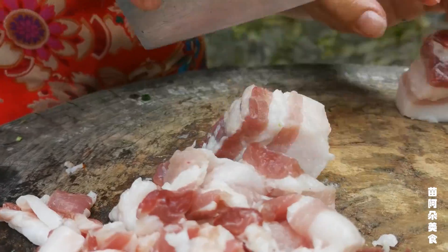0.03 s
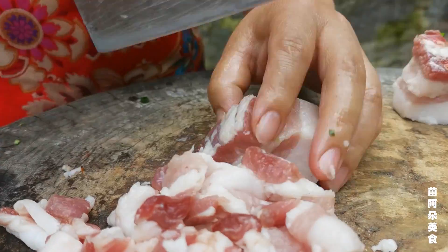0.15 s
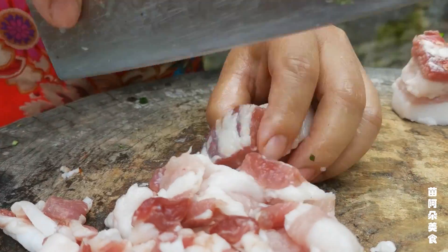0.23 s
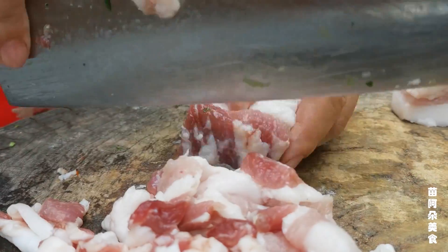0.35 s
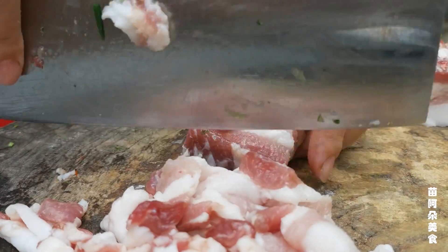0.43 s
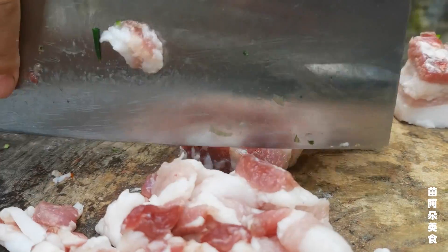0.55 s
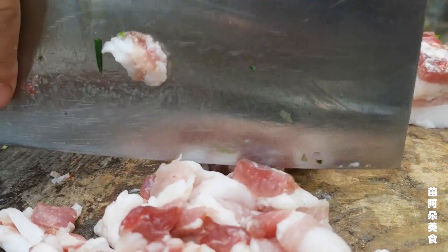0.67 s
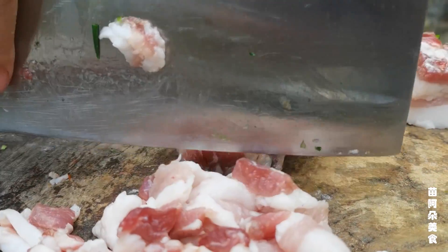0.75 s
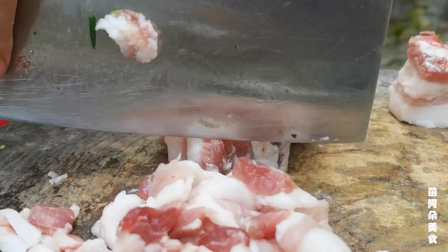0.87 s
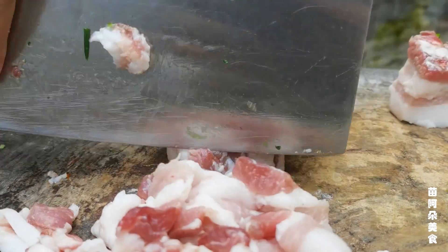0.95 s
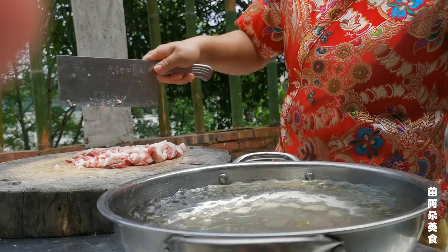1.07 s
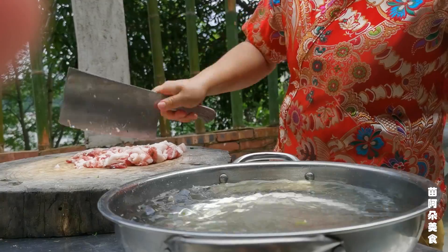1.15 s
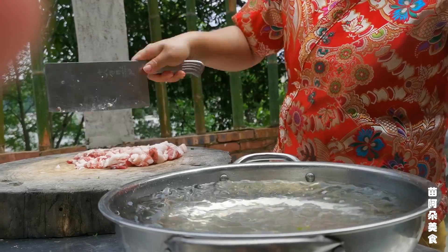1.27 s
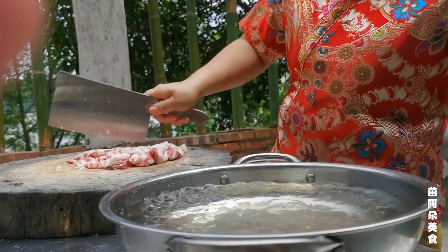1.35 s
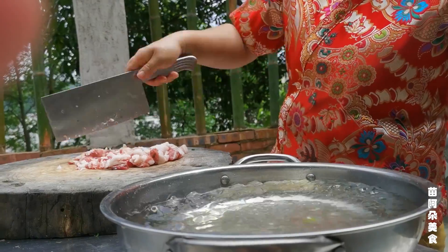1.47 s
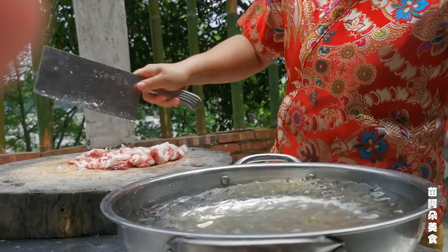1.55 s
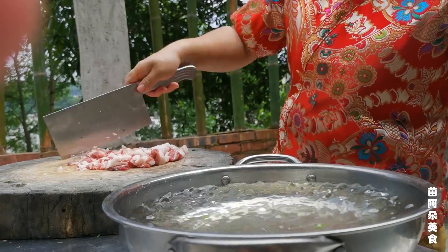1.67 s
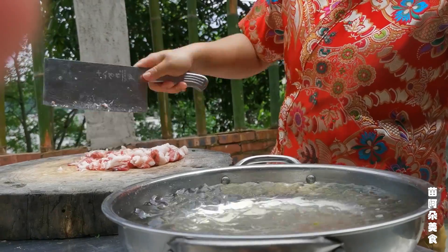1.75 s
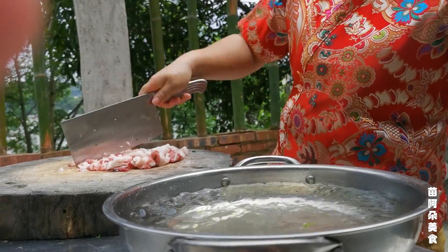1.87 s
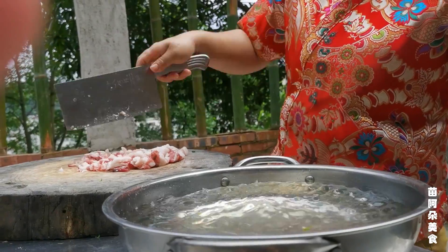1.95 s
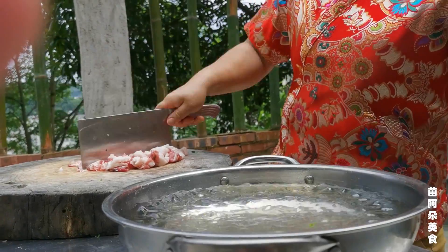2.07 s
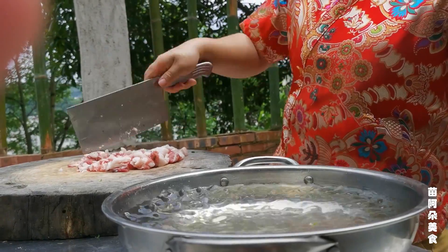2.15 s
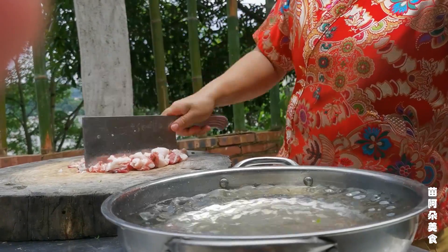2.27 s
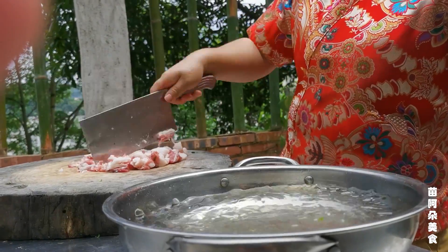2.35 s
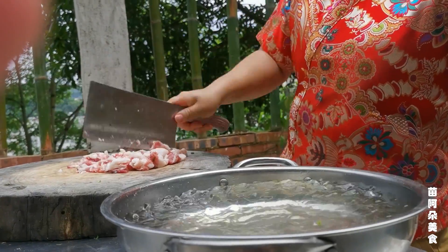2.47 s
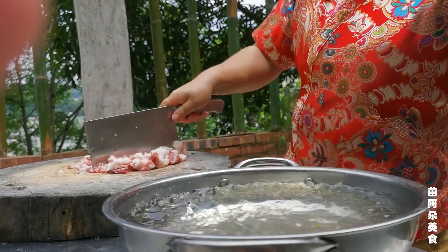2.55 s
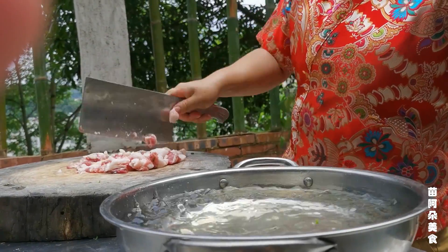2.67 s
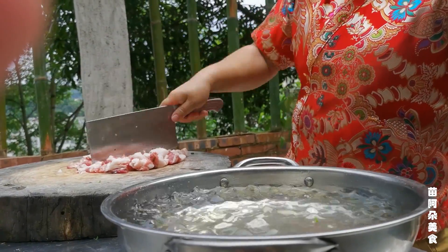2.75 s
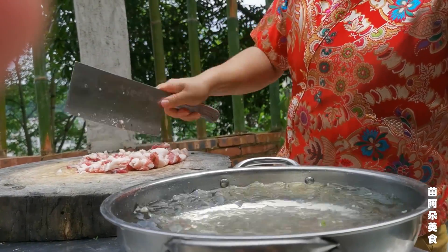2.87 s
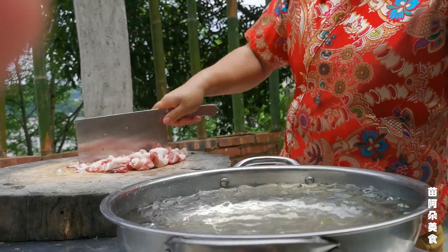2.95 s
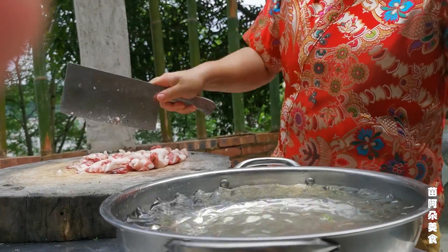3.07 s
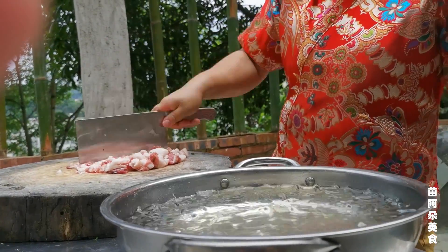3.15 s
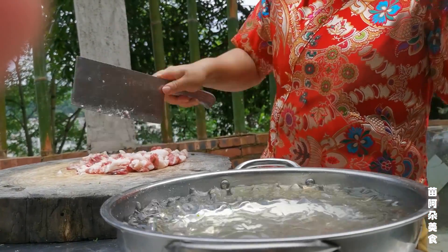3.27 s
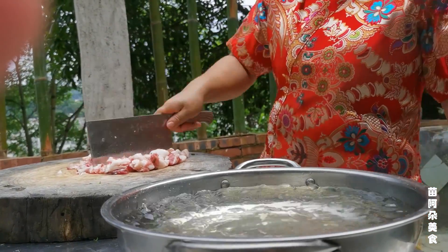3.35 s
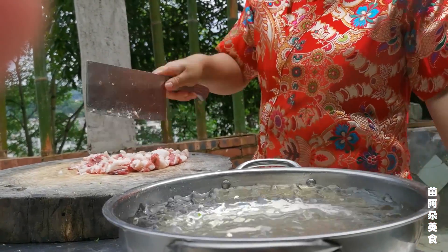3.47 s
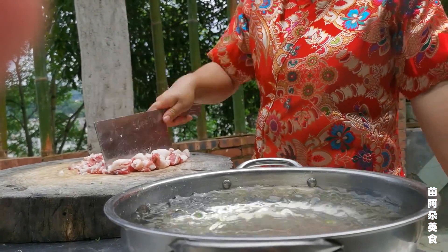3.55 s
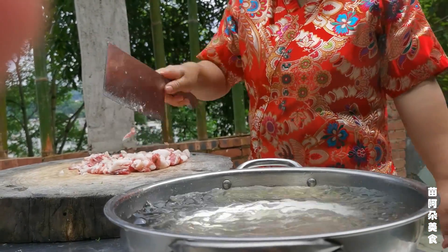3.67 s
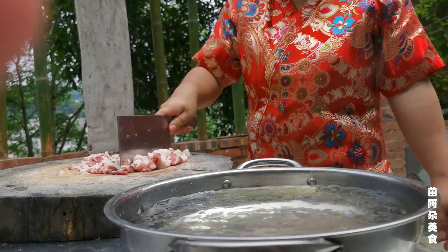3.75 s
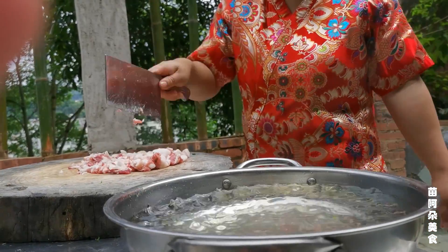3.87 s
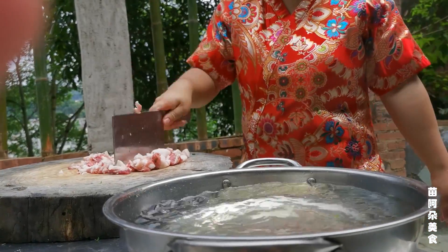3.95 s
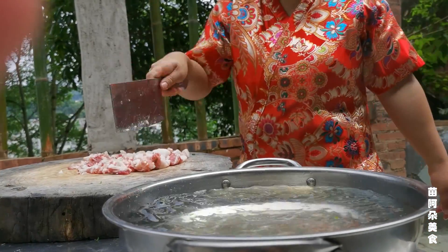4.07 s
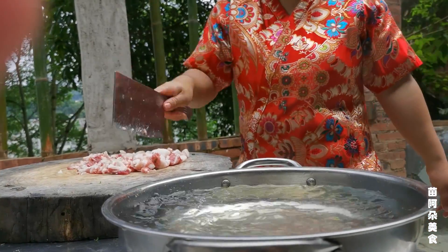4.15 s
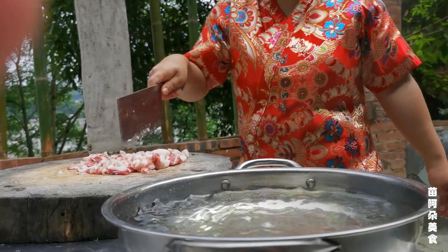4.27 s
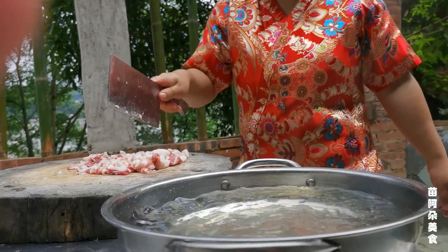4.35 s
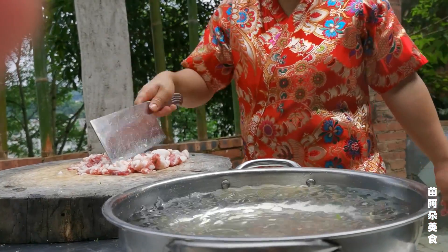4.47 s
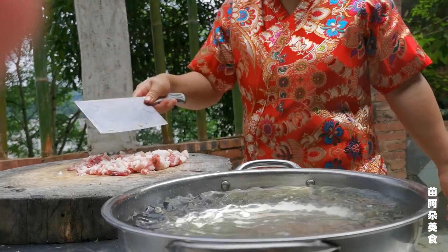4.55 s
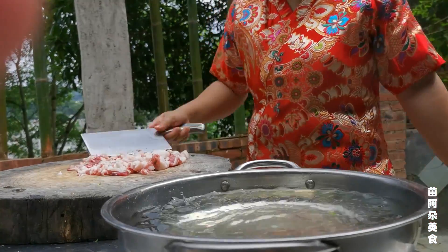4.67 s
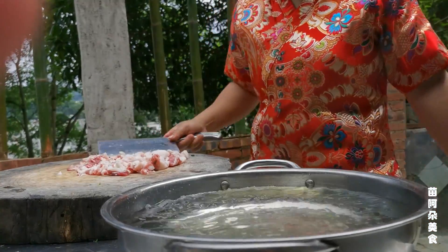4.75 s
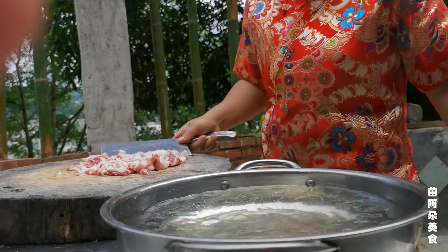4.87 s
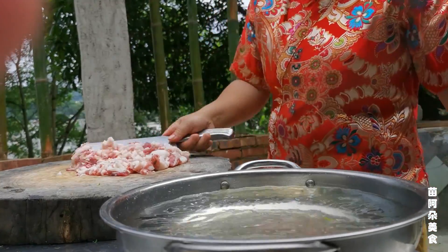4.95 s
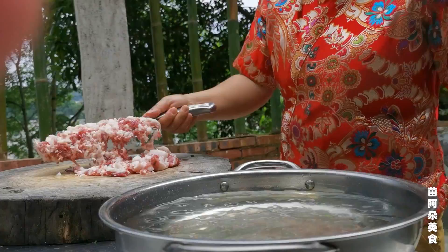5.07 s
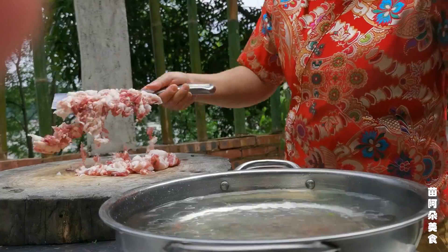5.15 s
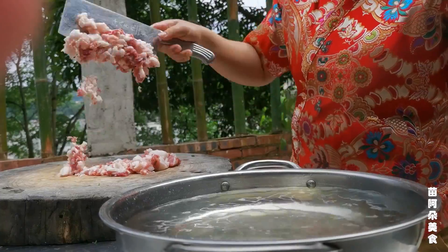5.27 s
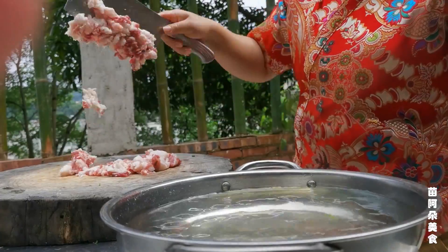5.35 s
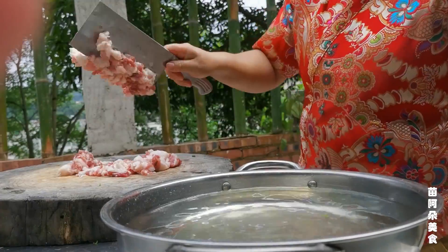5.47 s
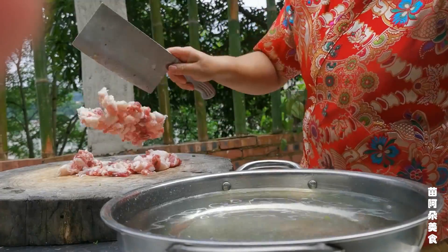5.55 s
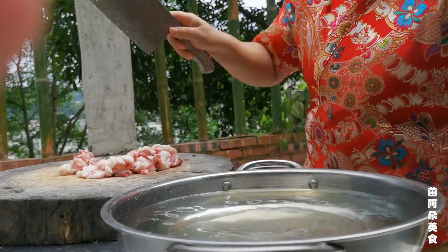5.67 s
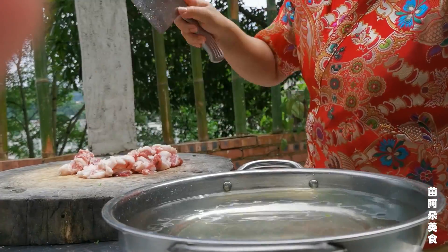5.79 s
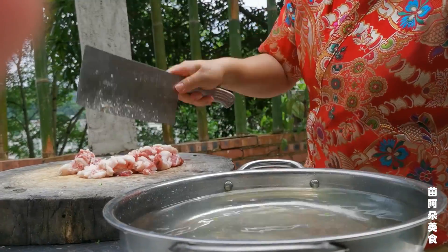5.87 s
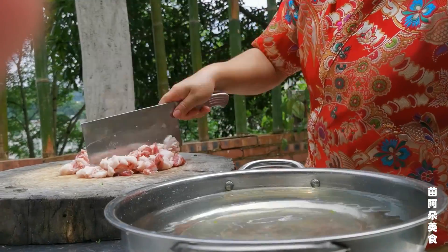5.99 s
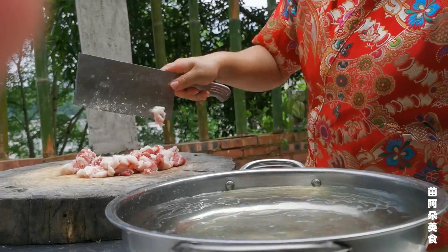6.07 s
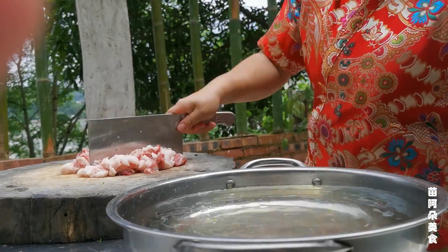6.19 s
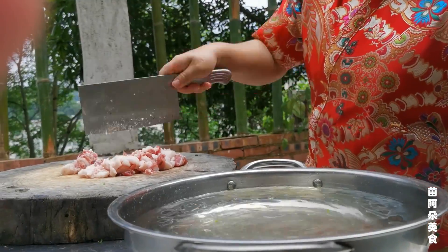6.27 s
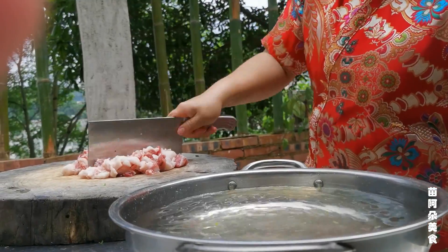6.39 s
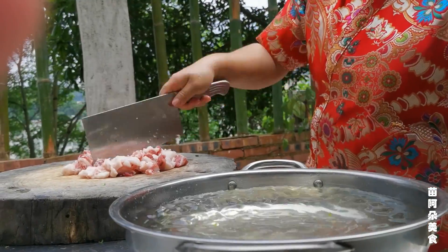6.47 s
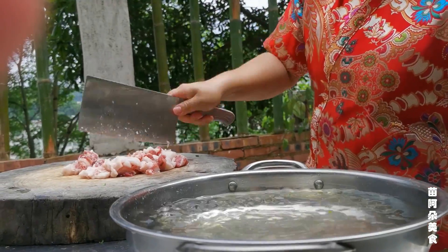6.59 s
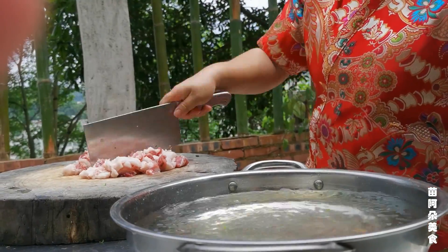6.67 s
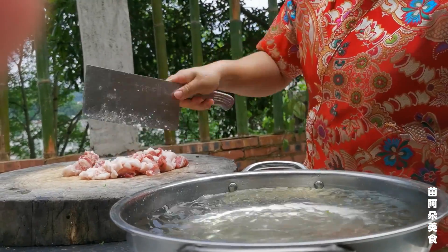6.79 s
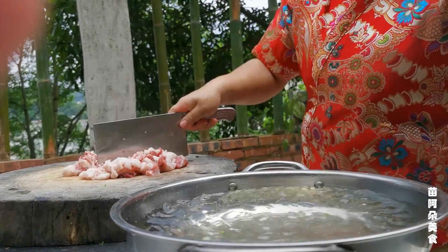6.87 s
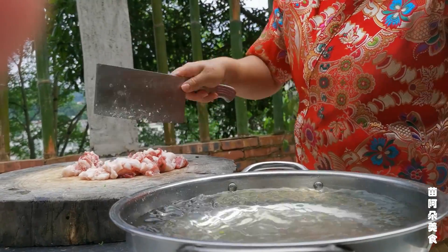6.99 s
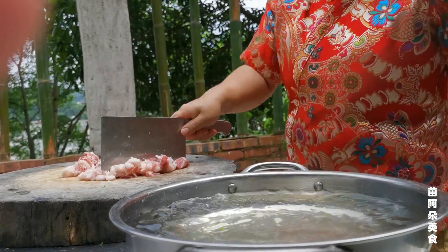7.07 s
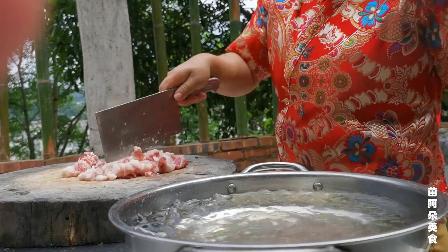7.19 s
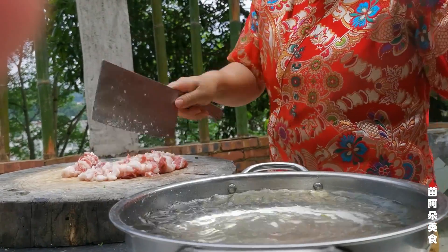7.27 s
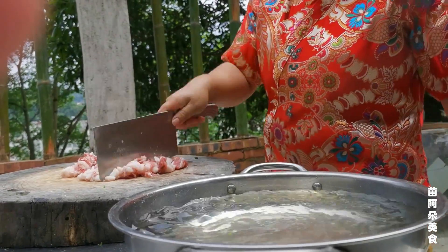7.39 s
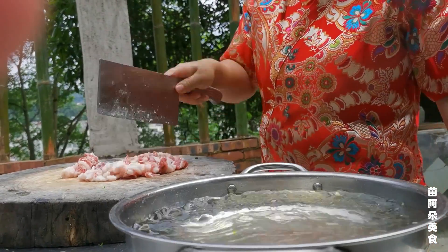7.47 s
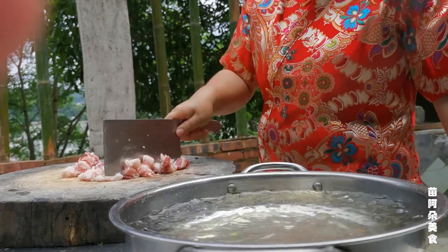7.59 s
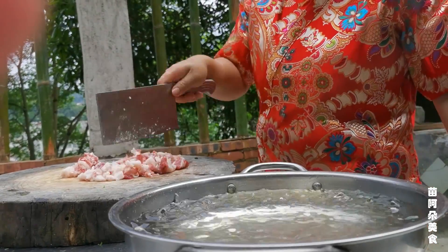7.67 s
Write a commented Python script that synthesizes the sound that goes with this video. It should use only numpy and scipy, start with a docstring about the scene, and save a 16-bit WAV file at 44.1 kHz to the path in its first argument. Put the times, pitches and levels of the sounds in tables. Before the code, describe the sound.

A very quiet outdoor start with low rumble, distant rush, thin electric buzz, fading insect and soft finger ticks cuts to total silence. Close, loud cleaver blows follow in a steady rhythm on a heavy block, some crisp on wood, others dulled by meat, each shaking the table so a metal pot rattles afterwards. They stop for light blade taps and a short scrape, then little ticks, then heavier chopping with clearer pot clanks.

```python
"""Ticks, nudges, an insect and faint whirrs open over a far outdoor rush and a thin electric buzz.
After a short silence a cleaver minces meat on a thick wooden block: blows excite decaying modes and noise,
and a steel pot beside it jumps and clanks back down. Then the blade taps and scrapes in noise grains,
small ticks follow and the chopping resumes. Shaped noise makes the outdoors, locked harmonics the buzz."""
import sys
import numpy as np
from scipy import signal
from scipy.fft import rfft, irfft, next_fast_len
from scipy.io import wavfile
from scipy.ndimage import map_coordinates

SR = 44100
rng = np.random.default_rng(int(sys.argv[2]) if len(sys.argv) > 2 else 0)


def wrap_up_sound(samples):
    """Save the sound to the file named by the first command line argument, as 16-bit audio."""
    columns = np.atleast_2d(samples).T
    # keep every value between -1 and 1, then stretch to whole-number steps
    tamed = np.clip(columns, -1, 1)
    steps = np.round(tamed * 32767).astype(np.int16)
    wavfile.write(sys.argv[1], SR, steps)


N = 340893
T = np.arange(SR // 2) / SR  # time axis of one struck sound, s
# The silence: its start and end in seconds.
SILENCE_START_S, SILENCE_END_S = (1.156, 1.433)


def amp(db):
    """Decibel law: 20 dB is a factor of ten in amplitude."""
    return 10 ** (np.asarray(db) / 20)


def unit(x):
    """Normalisation to an rms of 1."""
    return x / np.sqrt(np.mean(x ** 2) + 1e-20)


def along(points, hz):
    """Interpolation of (Hz, value) points on a logarithmic frequency axis."""
    f, v = np.transpose(points)
    return np.interp(np.log(hz + 1), np.log(f + 1), v)


def curves(rows, **ends):
    """Linear interpolation in time: one value per sample for each column after the time."""
    s, *columns = np.transpose(rows)
    return [np.interp(np.arange(N) / SR, s, column, **ends) for column in columns]


def wobble(rate):
    """Random modulation: a smooth curve through rate random knots a second."""
    knots = rng.standard_normal(int(N * rate / SR) + 4)
    return map_coordinates(knots, [np.arange(N) * rate / SR])


def filtered(x, response):
    """Linear filtering: the spectrum times a complex response of frequency."""
    m = next_fast_len(N + SR // 2)
    return irfft(rfft(x, m) * response(np.fft.rfftfreq(m, 1 / SR)), m)[..., :N]


def coloured(x, spectrum):
    """Minimum-phase filtering with unit energy: causal, so nothing rings before the blow."""
    size = 8192
    level_db = np.maximum(along(spectrum, np.fft.rfftfreq(size, 1 / SR)), -90)
    cepstrum = irfft(np.log(amp(level_db)))
    # folding the cepstrum onto positive time makes the phase minimal
    cepstrum[1:size // 2] *= 2
    cepstrum[size // 2 + 1:] = 0
    impulse = irfft(np.exp(rfft(cepstrum)))
    return signal.fftconvolve(x, impulse[None] / np.linalg.norm(impulse), axes=1)[:, :N]


def noise(spectrum):
    """Spectrally shaped noise: two unrelated noises with a joint rms of 1."""
    return unit(filtered(rng.standard_normal((2, N)), lambda hz: amp(along(spectrum, hz))))


def add(track, s, sound):
    """Superposition: lay a sound into a track at s seconds."""
    part = track[:, round(s * SR):][:, :sound.shape[1]]
    part += sound[:, :part.shape[1]]


# Decay on the porch. Each row: frequency in Hz, 60 dB decay time in s before stretching.
PORCH = [(100, 0.48), (400, 0.47), (1100, 0.31), (3000, 0.37), (8000, 0.36), (15000, 0.22)]


def tail(stretch, rise, lumpy_db):
    """Diffuse decay: scattered noise whose every frequency dies at its own speed, in lumps."""
    hz, t, z = signal.stft(rng.standard_normal((2, len(T))), SR, nperseg=128)
    lumps_db = lumpy_db * rng.standard_normal(len(t) // 3 + 1).repeat(3)[:len(t)]
    decay_db = -60 * t / (stretch * along(PORCH, hz)[:, None])
    x = signal.istft(z * amp(lumps_db + decay_db), SR, nperseg=128)[1]
    return x[:, :len(T)] * (1 - np.exp(-T / rise))


def ring(modes, scatter_db, detune, rise):
    """Modal decay: modes at new strengths, retuned by where the blow lands; weaker in the scattered part."""
    hz, db, t60 = np.transpose(modes)[..., None]
    level, shift, phase = rng.standard_normal((3, len(modes), 1))
    fade = amp(db + scatter_db * level - 60 * T / t60) * (1 - np.exp(-T / rise))
    turn = 2 * np.pi * hz * (1 + detune * shift) * T
    direct = np.sum(fade * np.sin(turn), 0)
    scattered = .7 * np.sum(fade * np.sin(turn + 2 * phase), 0)
    return np.array([direct, scattered])


# Cleaver blows. Each row: start in seconds, strength in dB, cushioning by meat in dB at DULL_HZ,
# table thump in dB, crack of the edge in dB.
BLOWS = [(1.4354, -28, 14, -32.5, -40), (1.6123, -17.5, 2, -29, -17.5), (1.8319, -18.5, 5, -28.5, -24),
         (2.0647, -17, 4.5, -31, -14), (2.2931, -16.5, 17, -18.5, -23), (2.5133, -15.5, 14.5, -20.5, -28),
         (2.721, -20.5, 3.5, -27, -12.5), (2.9289, -20, 4.5, -31, -15.5), (3.134, -21.5, 3.5, -40, -14),
         (3.3463, -20.5, 1.3, -29.5, -16.5), (3.5593, -23, 1, -23.5, -23), (3.776, -22, 0.4, -22.5, -12),
         (4.0071, -20.5, 1.5, -26.5, -12.5), (4.227, -22, .6, -27, -15), (4.4425, -21.5, 3, -26.5, -20.5),
         (5.9564, -22.5, 27, -18, -20.5), (6.1977, -21, 6.5, -20.5, -19), (6.4335, -18, 3.5, -23, -14),
         (6.6586, -19.5, 7.5, -32, -13), (6.8818, -20, 0.2, -24.5, -18), (7.1145, -31, 36, -22, -33),
         (7.3604, -24, 22.5, -19.5, -22), (7.6036, -28, 13.5, -20.5, -26)]
SOFT_S_PER_DB = .0003  # cushioning sets the wood going more slowly
# Scattered knock of the wood. Each row: frequency in Hz, relative level in dB per Hz.
KNOCK_COLOUR = [(53, -16.5), (90, -5), (139, -6.5), (204, -2), (294, -4.5), (512, -4), (572, -3), (725, -8),
                (1280, -15), (2500, -29), (3250, -64.5), (5500, -120)]
# Struck face of the block. Each row: frequency in Hz, level in dB before cushioning, t60 in s.
FACE_MODES = [(310, -7, .03), (520, -4, .02), (730, -1, .011), (1050, -4, .01)]
# Echoes of table top, pillar and wall. Each row: delay in seconds, level in dB.
ECHOES = [(.0041, -5), (.0085, -10), (.024, -11)]
DULL_HZ = 598  # meat takes the full cushioning off the face here, less below, more above
KNOCK_DB = 22.5  # face modes over the blow strength


def block_knock():
    """Impact excitation: the struck face rings and echoes, with a diffuse knock of the wood around it."""
    wood, face = np.zeros((2, 2, N))
    for s, db, cushion_db, _, _ in BLOWS:
        rise = .0012 + SOFT_S_PER_DB * cushion_db
        add(wood, s, amp(db) * tail(stretch=1.123, rise=rise, lumpy_db=2.0))
        modes = [(hz, level - cushion_db * hz / DULL_HZ, t60) for hz, level, t60 in FACE_MODES]
        add(face, s, -amp(db + KNOCK_DB) * ring(modes, scatter_db=1.5, detune=.05, rise=.0009))
    walls = lambda hz: 1 + sum(amp(db) * np.exp(-2j * np.pi * hz * delay) for delay, db in ECHOES)
    return coloured(wood, KNOCK_COLOUR) + filtered(face, walls)


# Wet smack of meat. Each row: frequency in Hz, relative level in dB per Hz.
SMACK_COLOUR = [(710, -23), (1200, -5), (1290, -5.5), (2230, -5), (2830, -10.5), (4360, -13.5),
                (5240, -22.5), (7410, -18), (10400, -28), (15000, -30.5), (16000, -34.5)]
SMACK_DB = -12  # over the blow strength


def wet_smack():
    """Broadband friction and splash: the edge hisses ever louder through meat, then smacks wetly."""
    wet = np.zeros((2, N))
    cut = np.arange(500) / SR
    swell_db = -3.5 - 2300 * cut[::-1]
    for s, db, _, _, _ in BLOWS:
        hiss = amp(db + SMACK_DB + swell_db) * rng.standard_normal((2, len(cut)))
        add(wet, s - len(cut) / SR, hiss)
        add(wet, s, amp(db + SMACK_DB) * tail(stretch=1.056, rise=.0014, lumpy_db=1.5))
    return coloured(wet * unit(amp(2.16 * wobble(350))), SMACK_COLOUR)


# The edge meeting wood. Each row: frequency in Hz, relative level in dB, t60 in s.
CRACK_MODES = [(1550, 3, 0.0059), (2200, 3, 0.0055), (2865, 3, 0.0046), (3520, -1.5, 0.0099),
               (4380, -8, 0.0036)]


def edge_crack():
    """Short contact excitation: the hard edge rings strongly damped high modes."""
    cracks = np.zeros((2, N))
    for s, _, _, _, crack_db in BLOWS:
        add(cracks, s, amp(crack_db) * ring(CRACK_MODES, scatter_db=1.0, detune=.06, rise=.00039))
    return cracks


# Block. Each row: frequency in Hz, relative level in dB, t60 in s.
BLOCK_MODES = [(189.7, -4.5, 0.56), (217.2, -5, 0.79), (295, -1, 0.2), (388, -6.5, 0.33), (504.4, -4, 0.29)]
# Table under the block. Each row: frequency in Hz, relative level in dB, t60 in s.
TABLE_MODES = [(62.4, -4, 0.36), (80, 6, .1), (84.4, 2.5, 0.28), (110, -8, 0.35), (142.4, -5.5, 0.36)]
HUM_DB = -6  # block modes over the blow strength
SINK_S_PER_DB = .0003  # a cushioned blow reaches the table later
REBOUND_S, REBOUND_DB = .0125, -9  # the block rocks back onto the table: delay, level over the thump


def table_and_block():
    """Coupled resonance: the blow sets block and table humming, and the rebound shakes both again."""
    hum = np.zeros((2, N))
    for s, db, cushion_db, thump_db, _ in BLOWS:
        thump = ring(TABLE_MODES, scatter_db=1.8, detune=.03, rise=.006)
        add(hum, s + SINK_S_PER_DB * cushion_db, amp(thump_db) * thump)
        add(hum, s + REBOUND_S, shudder(thump_db + REBOUND_DB))
        rise = .0008 + SOFT_S_PER_DB * cushion_db
        add(hum, s, amp(db + HUM_DB) * ring(BLOCK_MODES, scatter_db=1.5, detune=.012, rise=rise))
    return hum


def shudder(db):
    """Added damping: table and block shaken from below die sooner than their own decay."""
    return amp(db - 60 * T / .24) * ring(TABLE_MODES + BLOCK_MODES, scatter_db=3.5, detune=.0427, rise=.0045)


def cleaver():
    """Superposition of the mechanisms of one blow: knock, smack, crack and hum."""
    return block_knock() + wet_smack() + edge_crack() + table_and_block()


# Landings of the pot. Each row: start in seconds, clank in dB, table thump in dB.
LANDINGS = [(1.4829, -39.5, -43), (1.5361, -42.5, -39.5), (1.756, -45, -47.5), (1.8867, -29.5, -38.5),
            (1.9456, -37, -31.5), (2.355, -24, -21), (2.575, -25.5, -19.5), (2.6662, -32, -44),
            (2.7747, -30, -34), (2.812, -30.5, -39), (2.9842, -32, -43.5), (3.0429, -37, -38),
            (3.1881, -37, -31), (3.6548, -39, -56.5), (4.2807, -38.5, -49.5), (4.4972, -31.5, -43.5),
            (4.5401, -35.5, -42.5), (6.0187, -26.5, -22), (6.0772, -37, -32.5), (6.1225, -39.5, -37.5),
            (6.2606, -25.5, -27), (6.3144, -36, -45.5), (6.4931, -29, -27.5), (6.5398, -38, -49.5),
            (6.719, -27, -24.5), (6.772, -26, -43), (6.9345, -36, -34.5), (7.1786, -27.5, -23.5),
            (7.223, -34, -27), (7.42, -28, -31), (7.46, -33.5, -34), (7.6602, -28.5, -23.5),
            (7.706, -37, -28)]
# Steel pot. Each row: frequency in Hz, relative level in dB, t60 in s.
POT_MODES = [(1700, -9, .15), (1916, -1, .25), (2150, -2, .09), (2450, -5, .08), (3058, -9, .22),
             (3370, -10, .1), (4091, -7, .3), (4560, -12, .18), (5561, -18, .12), (7060, -8, .05),
             (7400, -12, .05)]
# Clank and light splashes. Each row: frequency in Hz, relative level in dB per Hz.
CLANK_COLOUR = [(590, -20), (1000, -4.5), (1380, -10.5), (1980, 1), (2230, -2.5), (2530, -10.5),
                (4120, -12.5), (4900, -17.5), (5380, -19), (7100, -14), (10100, -24.5), (14900, -25),
                (16000, -13.5)]
RING_DB = -8  # the pot's ring over the clank
RIM_SHARE = .24  # dB of ring per dB of clank over thump: a rim landing thumps less and rings more


def pot():
    """Rattle and modal ringing: each landing shakes the table too, and a rocking base roughens the ring."""
    rattle, steel, table = np.zeros((3, 2, N))
    for s, clank_db, thump_db in LANDINGS:
        add(rattle, s, amp(clank_db) * tail(stretch=.79, rise=.00075, lumpy_db=.17))
        ring_db = clank_db + RING_DB + RIM_SHARE * (clank_db - thump_db)
        add(steel, s, amp(ring_db) * ring(POT_MODES, scatter_db=4, detune=.005, rise=.0006))
        add(table, s, shudder(thump_db))
    rocking = np.tanh(wobble(90) + .8)
    uneven = unit(amp(2.5 * wobble(300)))
    return coloured(rattle * uneven, CLANK_COLOUR) + steel * unit(rocking) + table


# Ticks of scraps and fingers. Each row: start in seconds, ring level in dB, pitch in Hz, splash in dB.
TICKS = [(.249, -47, 1950, -66), (.411, -37, 3200, -53), (.738, -43, 3170, -49), (5.358, -51, 1880, -51.5),
         (5.522, -54, 3940, -55), (5.632, -49, 2320, -46), (5.65, -58, 9100, -56), (5.23, -60, 2300, -60),
         (5.74, -60, 3500, -58)]
# Fingers push meat on the wood. Each row: start in seconds, level in dB.
NUDGES = [(.189, -58), (.249, -50.5), (.411, -57), (.74, -52.5)]
# The flat blade touches the block. Each row: start in seconds, splash level in dB.
TAPS = [(4.759, -39.5), (4.793, -32), (4.86, -39)]
# Steel blade. Each row: frequency in Hz, relative level in dB when tapped, t60 in s when tapped.
STEEL_MODES = [(465, -3, .2), (664, -4, .12), (980, -6, .15), (1390, -12, .08), (2050, -1, .1),
               (2880, -14, .07), (3310, -2, .05), (3680, -5, .06), (4300, -10, .06), (5150, -11, .06),
               (7060, -20, .05), (8900, -18, .06)]
# Wood under light touch. Each row: frequency in Hz, relative level in dB per Hz.
WOOD_COLOUR = [(88, -56), (150, -4.5), (189, -2.5), (641, -6.5), (681, 2.5), (732, -5.5), (1700, -19),
               (2210, -52), (3740, -120)]
TICK_T60_S = .016
TAP_RING_DB, TAP_KNOCK_DB = 3, .8  # steel and wood over the splash


def light_touches():
    """Weak impact excitation: small rings with splashes for ticks and taps, wooden knocks for nudges and taps."""
    pings, knocks, splash = np.zeros((3, 2, N))
    touches = [(s, db, [(hz, 0, TICK_T60_S)], splash_db) for s, db, hz, splash_db in TICKS]
    touches += [(s, db + TAP_RING_DB, STEEL_MODES, db) for s, db in TAPS]
    for s, db, modes, splash_db in touches:
        add(pings, s, amp(db) * ring(modes, scatter_db=1.5, detune=.003, rise=.0005))
        add(splash, s, amp(splash_db) * tail(stretch=.28, rise=.0004, lumpy_db=1.5))
    for s, db in NUDGES + [(s, db + TAP_KNOCK_DB) for s, db in TAPS]:
        add(knocks, s, amp(db) * tail(stretch=.76, rise=.00076, lumpy_db=.5))
    return pings + coloured(splash, CLANK_COLOUR) + coloured(knocks, WOOD_COLOUR)


# The scrape. Each row: time in seconds, wood level in dB, blade level in dB before its two parts are mixed.
SCRAPE = [(4.855, -60, -58), (4.865, -39.5, -47.5), (4.92, -40, -40.5), (4.96, -43, -42), (5, -58, -57),
          (5.06, -61, -76)]
# Scraping edge. Each row: frequency in Hz, relative level in dB per Hz.
BLADE_COLOUR = [(820, -30.5), (1400, -3.5), (1750, -11.5), (1880, -4.5), (3010, -5.5), (3360, -4),
                (4660, -12), (8250, -25), (9230, -15), (16000, -55)]


def scrape():
    """Friction excitation: the edge dragged over wood in short grains drives damped blade resonances."""
    wood_db, blade_db = curves(SCRAPE, left=-120, right=-120)
    grains = unit(amp(2.0 * wobble(300) + 1.7 * wobble(40)))
    width = 70  # Hz: the wood damps the dragged blade

    def resonances(f):
        """Sum of second-order resonances with alternating sign."""
        total = 0
        for k, (centre, db, _) in enumerate(STEEL_MODES):
            loss = 1j * f * width
            total = total + (-1) ** k * amp(.6 * db) * loss / (centre * centre - f * f + loss)
        return total

    song = unit(filtered(rng.standard_normal((2, N)), resonances))
    blade = 1.1 * noise(BLADE_COLOUR) + 1.07 * song
    return grains * (amp(wood_db) * noise(WOOD_COLOUR) + amp(blade_db) * blade)


# Outdoor levels before and after the silence. Each row: time in seconds, rumble in dB, rush in dB,
# hiss in dB before HISS_LIFT_DB.
AIR_BEFORE, AIR_AFTER = [
    [(0.0, -54, -66.5, -69), (0.206, -49, -65, -62), (1.14, -50.5, -64, -67)],
    [(5.08, -57, -57.5, -64), (5.394, -60.5, -58, -70.5), (5.9, -59.5, -57.5, -70)],
]
# Rumble, rush and hiss. Each row: frequency in Hz, relative level in dB per Hz.
RUMBLE_COLOUR = [(12, -40), (20, -7.5), (48, -2.5), (92, -7.5), (200, -7.5), (414, -22), (500, -24.5),
                 (650, -33), (1100, -120)]
RUSH_COLOUR = [(210, -43), (350, -31), (676, -6.5), (906, -4), (1120, -8), (2060, -10), (4080, -16),
               (5100, -22.5), (5800, -21.5), (7540, -26.5), (12800, -120)]
HISS_COLOUR = [(2940, -47), (5000, -28.5), (5900, -14.5), (6380, -9.5), (6890, -3), (8500, 0.5),
               (11300, -17.5), (13300, -11.5), (15000, -13), (16000, -0.5)]
HISS_LIFT_DB = 2.0


def outdoor_air():
    """Shaped noise with random level modulation: rumble, far rush and hiss drift a little."""
    before = np.arange(N) < SILENCE_END_S * SR
    rumble_db, rush_db, hiss_db = np.where(before, curves(AIR_BEFORE), curves(AIR_AFTER))
    hiss = noise(HISS_COLOUR)
    hiss = hiss + before * .3 * filtered(hiss, lambda hz: hz > 9500)  # brighter before the silence
    rumble = amp(rumble_db + 3.0 * wobble(9.3)) * noise(RUMBLE_COLOUR)
    rush = amp(rush_db + .5 * wobble(8.3)) * noise(RUSH_COLOUR)
    return rumble + rush + amp(hiss_db + HISS_LIFT_DB + .8 * wobble(13)) * hiss


# Insect level. Each row: time in seconds, level in dB.
INSECT_LEVEL = [(0, -62), (.1, -59), (.4, -59), (.55, -71), (.62, -89)]
# Insect chirr. Each row: frequency in Hz, relative level in dB per Hz.
CHIRR_COLOUR = [(2000, -60), (3400, -27), (3730, -0.5), (4190, 0.5), (5330, -5), (6000, -20), (7800, -52),
                (13200, -120)]


def insect():
    """Amplitude-modulated band noise: the insect chirrs unevenly and fades."""
    level_db, = curves(INSECT_LEVEL, right=-120)
    return amp(level_db + .78 * wobble(60.7)) * noise(CHIRR_COLOUR)


# Faint far whirrs. Each row: start in seconds, length in seconds, pitch in Hz,
# half width in Hz (to 1/e), level in dB at the top of the swell.
WHIRRS = [(0.614, 0.25, 3720, 250, -65), (.45, 0.27, 2300, 200, -74), (0.83, .4, 2300, 250, -72),
          (.85, .6, 1380, 310, -61.5)]


def whirrs():
    """Narrow-band noise under a half-sine swell."""
    t = np.arange(N) / SR
    total = np.zeros((2, N))
    for s, length, pitch, width, db in WHIRRS:
        band = filtered(rng.standard_normal((2, N)), lambda f: np.exp(-((f - pitch) / width) ** 2))
        swell = np.sin(np.pi * np.clip((t - s) / length, 0, 1))
        total += amp(db) * swell * unit(band)
    return total


# Strength of the buzz harmonics. Each row: frequency in Hz, rms in dB before random unevenness
# and the opening boost.
BUZZ_LEVEL = [(5800, -97), (6400, -82), (7100, -89), (7500, -85), (8500, -84), (9500, -92), (10500, -97),
              (12500, -105), (14500, -96), (15700, -99)]
BUZZ_HZ = 200
# Boost of the buzz before the silence: up to 10 kHz in dB, above 10 kHz in dB.
OPENING_LOW_DB, OPENING_HIGH_DB = 3.5, 8


def buzz():
    """Fourier series of steady electric pulses: harmonics in phase, alike in both channels."""
    hz = BUZZ_HZ * np.arange(29, 79)[:, None]
    t = np.arange(N) / SR
    uneven_db = 2.5 * rng.standard_normal(hz.shape)
    boost = amp(np.where(hz > 10000, OPENING_HIGH_DB, OPENING_LOW_DB))
    opening = np.where(t < SILENCE_START_S, boost, 1)
    level = amp(along(BUZZ_LEVEL, hz) + uneven_db) * opening
    return np.sqrt(2) * np.sum(level * np.cos(2 * np.pi * hz * t), 0)


# Stereo likeness. Each row: frequency in Hz, left-right correlation for equal unrelated parts.
ALIKE = [(60, 0.91), (250, 0.99), (600, 0.97), (1500, 0.34), (4000, 0.14), (12000, 0.29)]
# Stereo balance. Each row: frequency in Hz, left minus right in dB before scaling by lean.
LEAN = [(60, 3.5), (150, 0.5), (380, 0.5), (950, 1.5), (2380, 6.5), (5980, 11), (15000, 6.5)]
# Stereo phase. Each row: frequency in Hz, radians by which the left port hears earlier.
LEAD = [(50, -0.7), (250, 0.49), (600, 1.11), (1030, 1.11), (1900, 5), (4000, 7.5), (16000, 22)]


def ports(pair, lean):
    """Interchannel coherence, level and phase: a direct and a scattered part become left and right."""
    angle = lambda hz: np.arccos(np.clip(along(ALIKE, hz), -1, 1)) / 2
    mid, side = filtered(pair, lambda hz: np.array([np.cos(angle(hz)), np.sin(angle(hz))]))
    half = np.array([[.5], [-.5]])  # each port takes half of every difference
    tilt = lambda hz: amp(half * lean * along(LEAN, hz)) * np.exp(1j * half * along(LEAD, hz))
    return filtered(np.array([mid + side, mid - side]), tilt)


def scene():
    """Superposition of the near sources, the outdoors and the buzz."""
    near = cleaver() + pot() + light_touches() + scrape()
    far = outdoor_air() + insect() + whirrs()
    return ports(near, lean=.76) + ports(far, lean=.69) + buzz()


TOP_HZ = 15850  # band limit


def record(dry):
    """Saturation, gating and band limiting: peaks bend at full scale, the silence cuts in, the top is cut off."""
    t = np.arange(N) / SR
    fade_out = np.clip((SILENCE_START_S - t) / .0023, 0, 1)
    fade_in = np.clip((t - SILENCE_END_S) / .0024, 0, 1)
    soft = dry / (1 + np.abs(dry) ** 6) ** (1 / 6)
    return filtered(soft * (fade_out + fade_in), lambda hz: np.clip((TOP_HZ - hz) / 150, 0, 1) ** 2)


dry = scene()
out = record(dry)
wrap_up_sound(out)
```